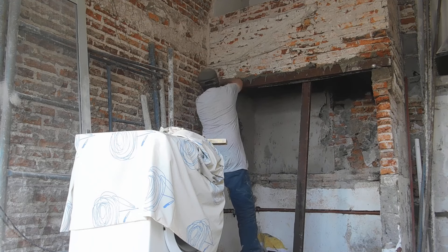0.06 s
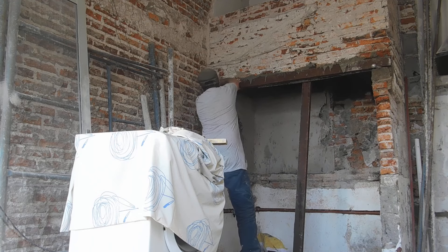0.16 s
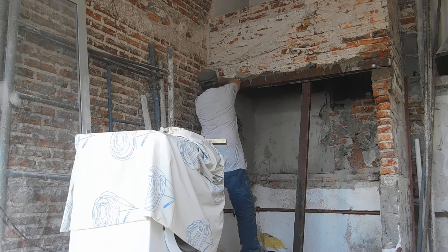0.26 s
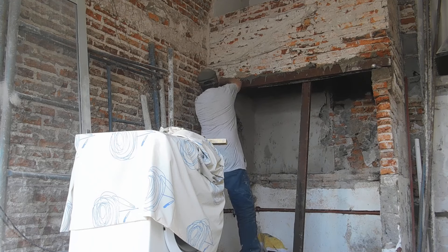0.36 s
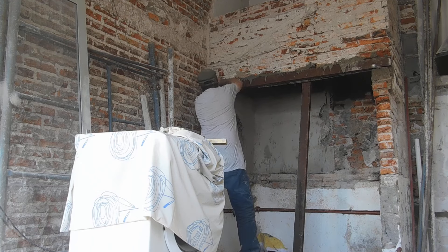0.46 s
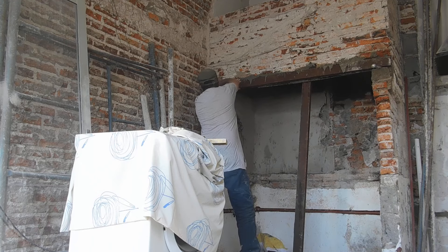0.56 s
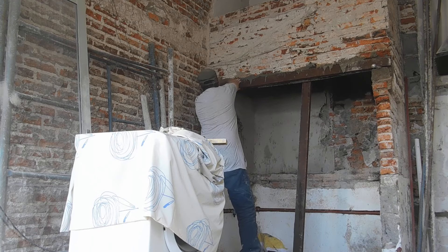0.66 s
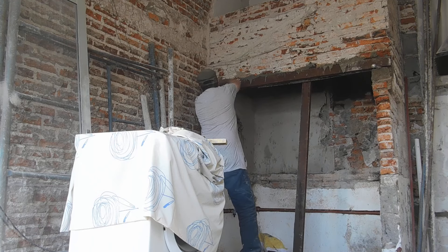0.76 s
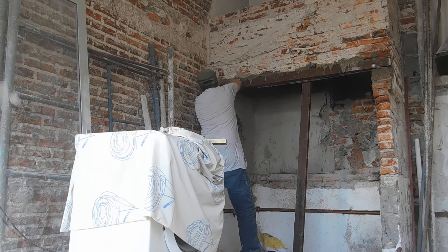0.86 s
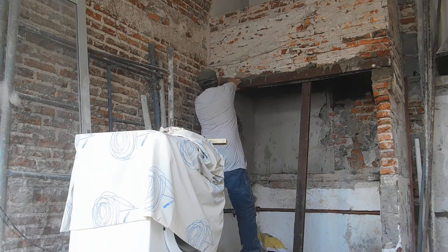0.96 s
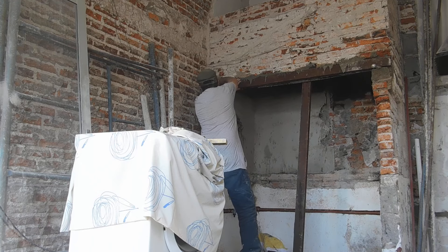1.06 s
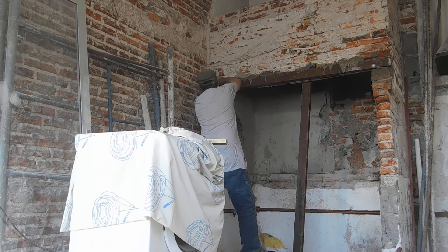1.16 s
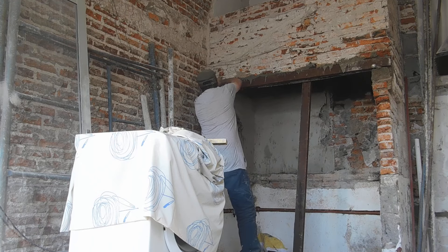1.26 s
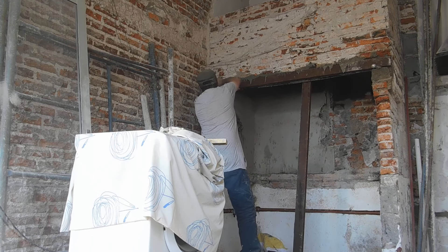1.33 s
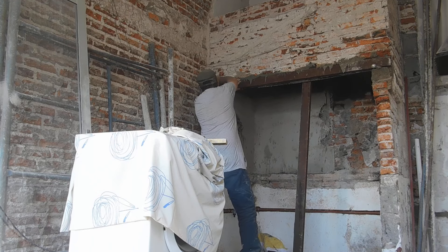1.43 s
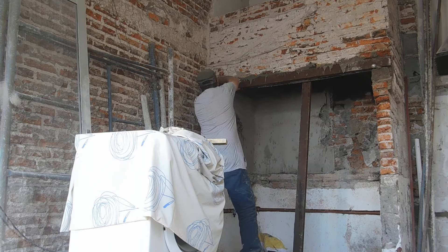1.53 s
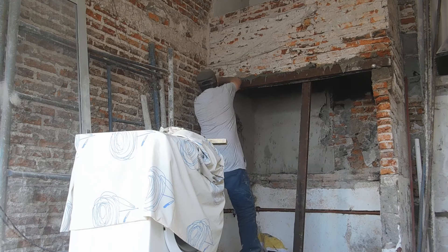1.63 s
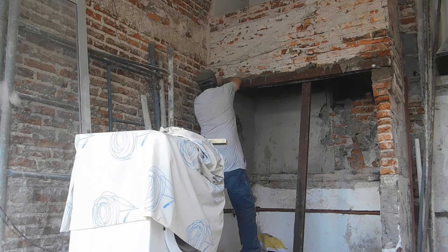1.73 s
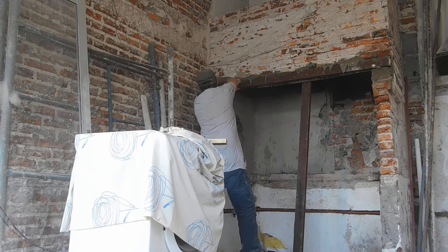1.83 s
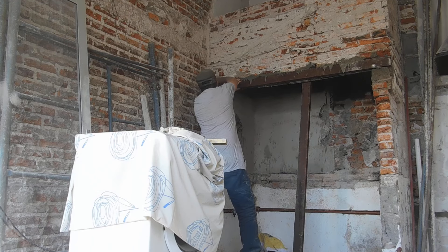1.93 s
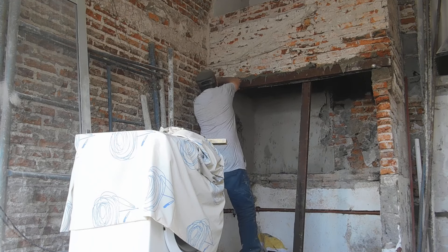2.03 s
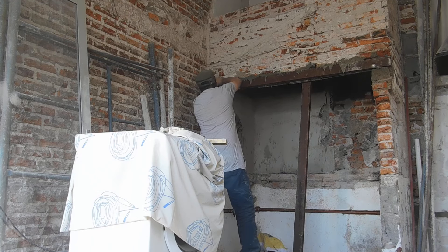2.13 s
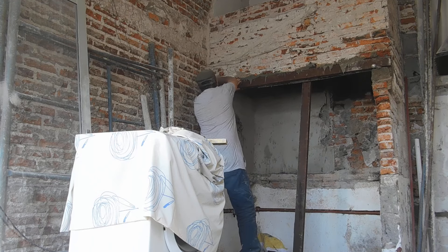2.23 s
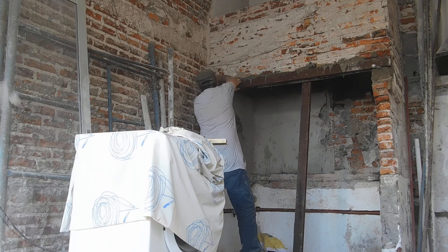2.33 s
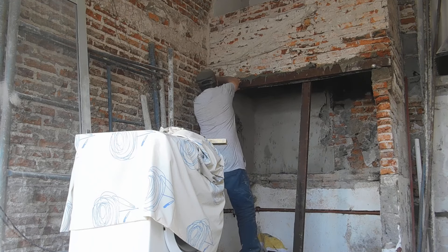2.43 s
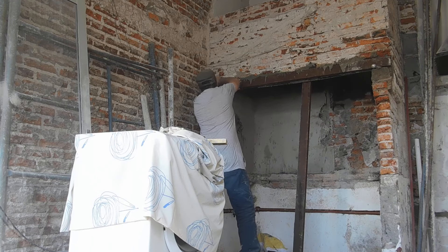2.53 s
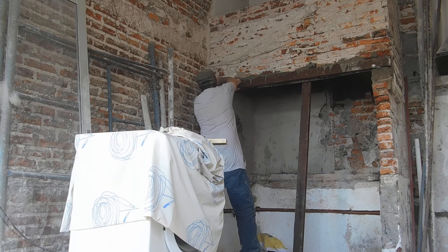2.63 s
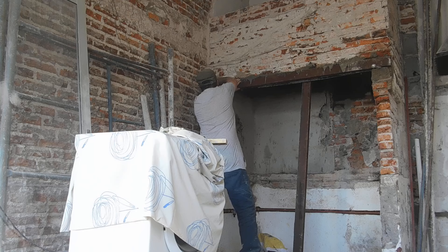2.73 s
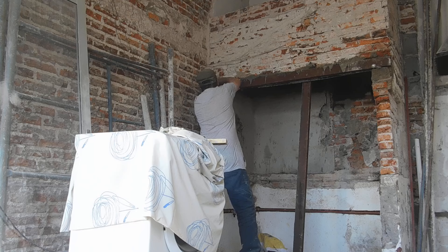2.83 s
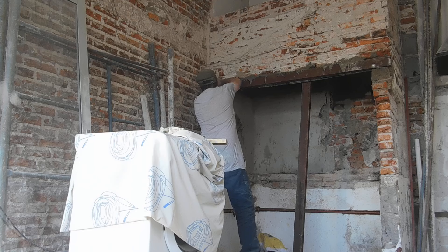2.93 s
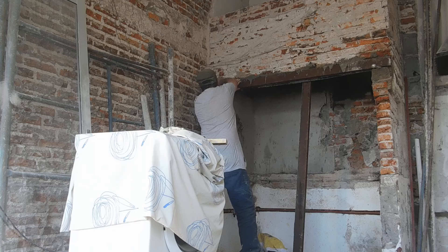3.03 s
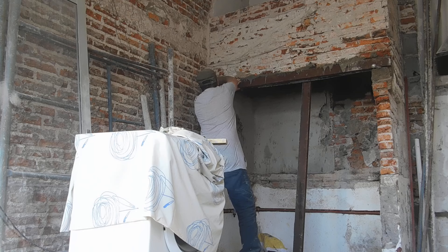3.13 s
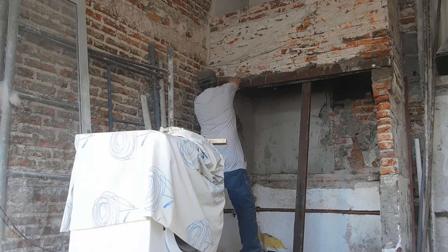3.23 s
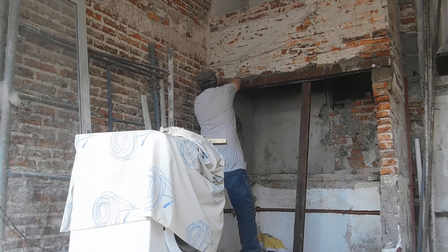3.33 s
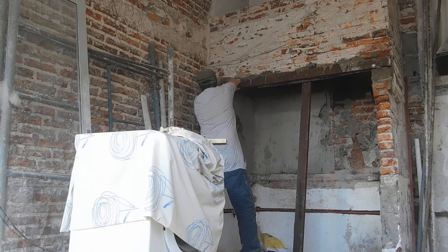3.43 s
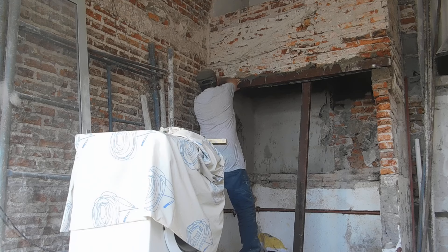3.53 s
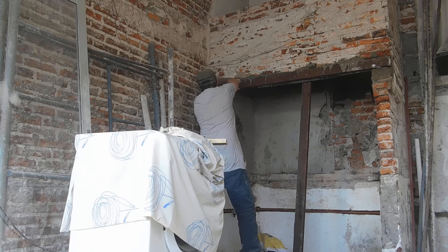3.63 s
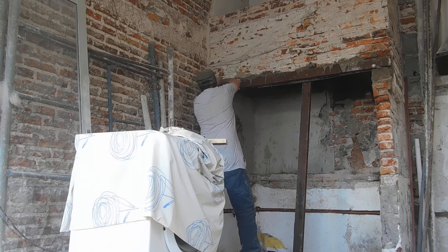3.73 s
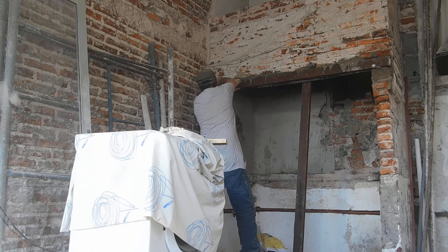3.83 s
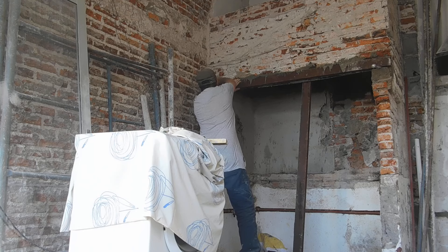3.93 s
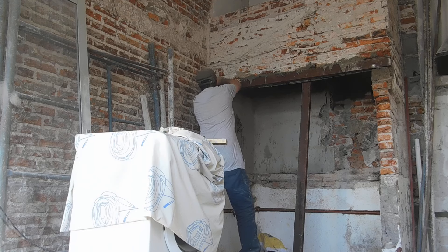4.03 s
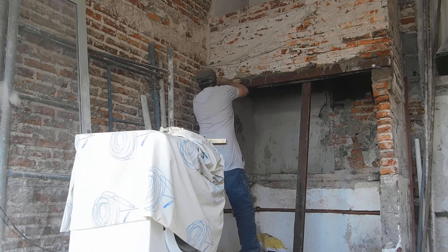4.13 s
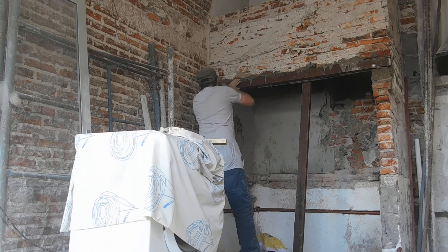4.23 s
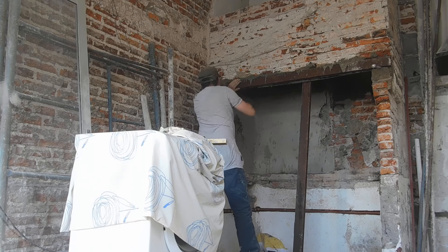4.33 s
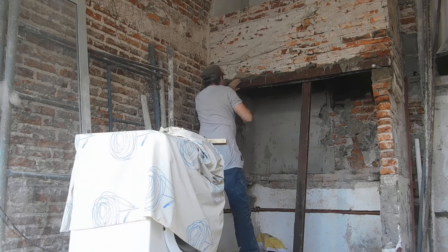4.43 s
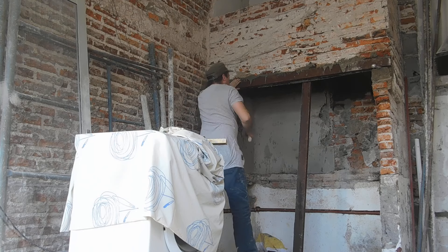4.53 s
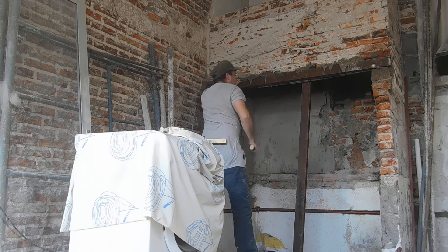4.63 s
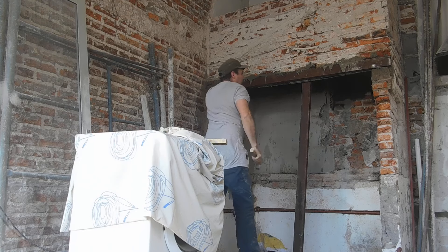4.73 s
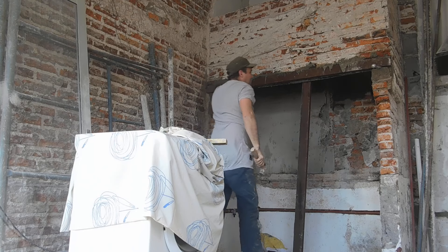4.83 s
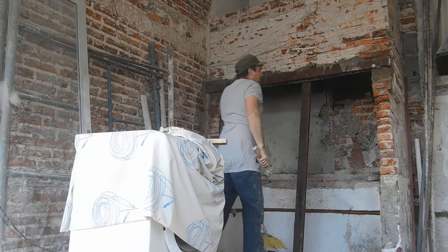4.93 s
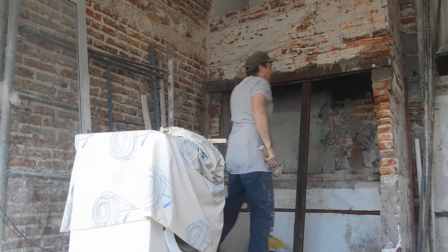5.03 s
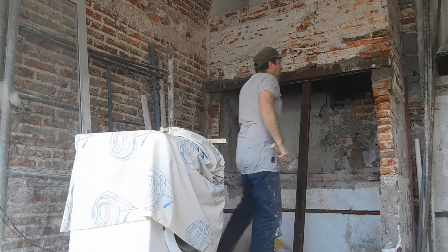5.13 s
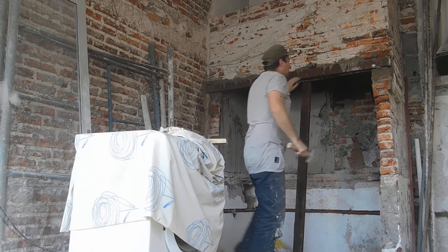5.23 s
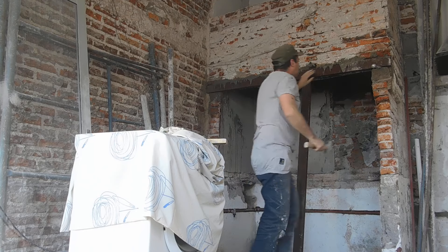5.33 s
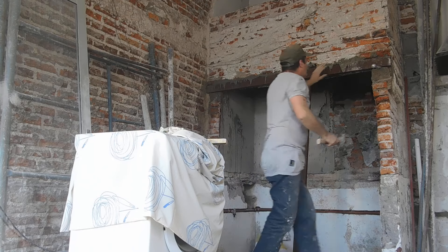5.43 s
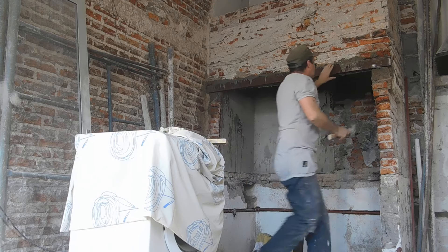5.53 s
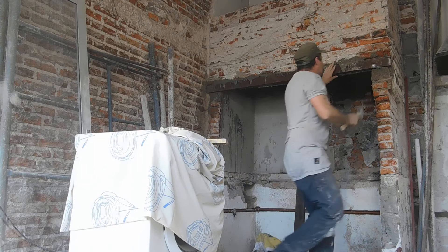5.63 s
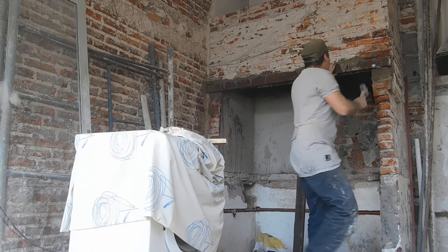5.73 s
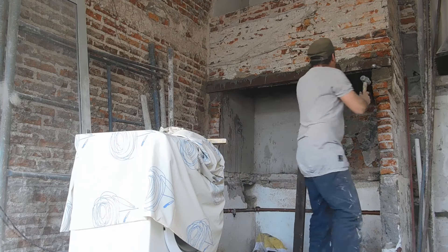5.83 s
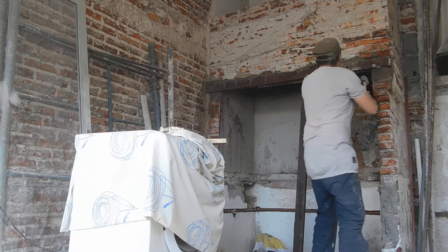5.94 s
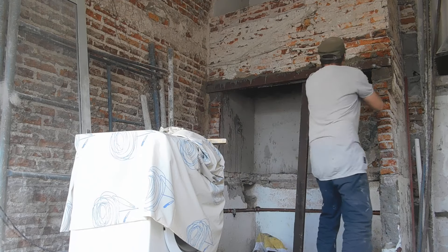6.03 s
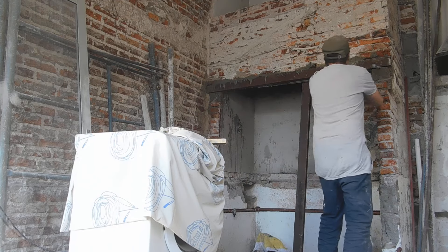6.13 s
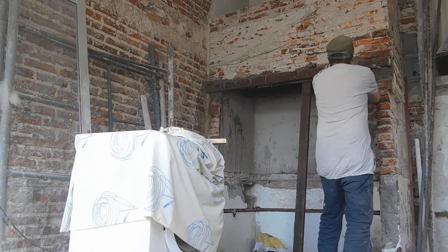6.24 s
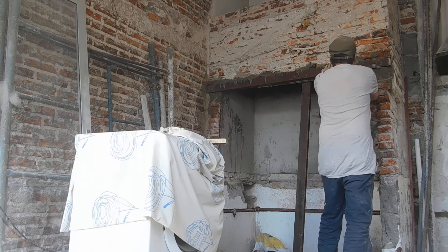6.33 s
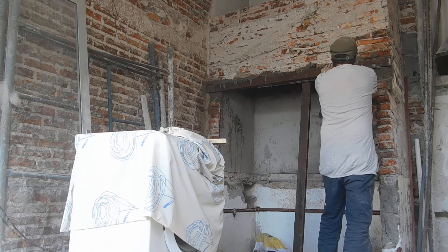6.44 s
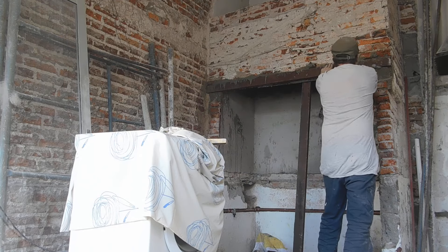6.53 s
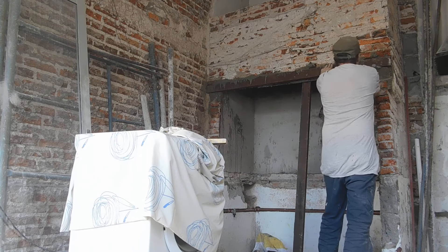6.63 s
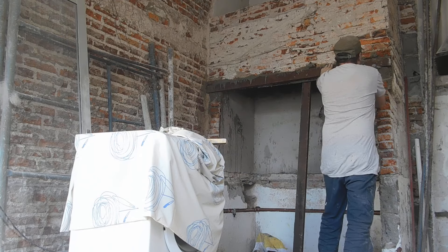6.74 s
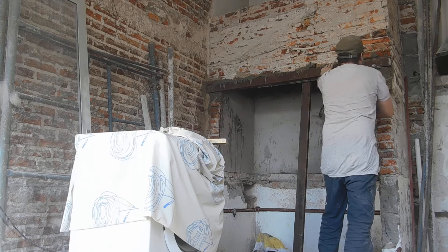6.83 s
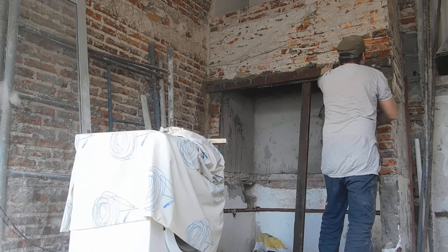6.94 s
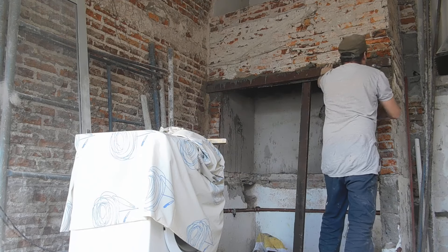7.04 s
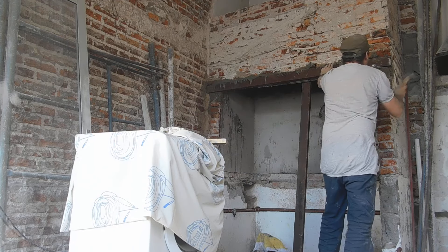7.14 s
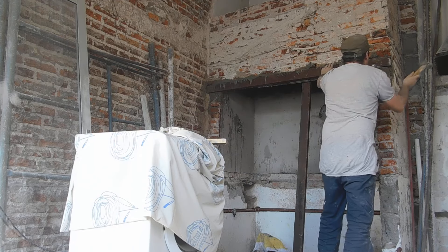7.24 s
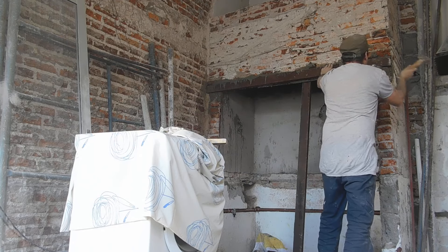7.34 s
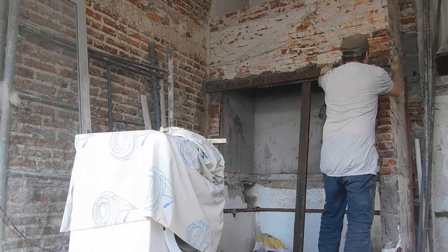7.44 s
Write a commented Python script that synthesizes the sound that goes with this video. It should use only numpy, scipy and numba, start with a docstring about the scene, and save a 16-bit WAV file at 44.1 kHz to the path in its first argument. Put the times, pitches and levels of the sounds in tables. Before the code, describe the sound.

A hammer hits a steel beam bedded in brick, ten loud blows about 0.4 seconds apart, each a cracking thud with a short, damped metallic clang and a patter of mortar crumbs. Then soft knocks and gritty footsteps, and one more blow at another spot. Bare, hard room; distant traffic faintly underneath; stereo microphones at a modest distance overload on the strikes.

```python
"""A hammer strikes a steel lintel bedded in brick: ten even blows at one spot, a few scuffing steps,
then one more blow at the other end. Detuned steel modes ring over decaying noise for cracking masonry;
tiny noise bursts patter as grit. Rubbed grit, soft knocks, thin clinks and a distant town fill the gaps.
A bare brick room rings on, and the two microphones overload and limit on the blows."""
import sys
import numpy as np
from scipy import signal
from scipy.fft import rfft, irfft, next_fast_len
from scipy.io import wavfile
from numba import njit

SR = 44100
rng = np.random.default_rng(int(sys.argv[2]) if len(sys.argv) > 2 else 0)


def dump_mix(stems):
    """Bounce the given channels to the path in sys.argv[1] as a 16-bit WAV at rate SR."""
    frames = np.atleast_2d(stems).T  # one column per channel
    limited = np.clip(frames, -1, 1)  # hard clip at full scale
    pcm = np.round(limited * 32767).astype(np.int16)
    wavfile.write(sys.argv[1], SR, pcm)


N = 329868
TIME = np.arange(N) / SR
RING = TIME[:SR]  # the one second given to every struck sound


def undb(db):
    """Decibels to gain."""
    return 10 ** (np.asarray(db) / 20)


def unit(x):
    """Scale to rms 1."""
    return x / np.sqrt(np.mean(x ** 2))


def at(table, hz):
    """Read (frequency, value) points on a log-frequency axis."""
    f, value = np.transpose(table)
    return np.interp(np.log(np.maximum(hz, 1)), np.log(f), value)


def bins(size):
    """Frequencies in Hz of the spectrum of so many samples."""
    return np.arange(size // 2 + 1) * SR / size


def colour(x, table):
    """Causal minimum-phase filter with the given dB response, built from its cepstrum."""
    size = 4096
    cepstrum = irfft(np.log(undb(at(table, bins(size)))))
    # fold the cepstrum forward in time
    cepstrum[1:size // 2] *= 2
    cepstrum[size // 2 + 1:] = 0
    impulse = irfft(np.exp(rfft(cepstrum)))
    return signal.fftconvolve(x, impulse[None], axes=1)[:, :x.shape[1]]


def fade(t60):
    """Exponential decay over one second, falling 60 dB in t60 seconds."""
    return np.exp(-np.log(1000) * RING / max(t60, 1 / SR))


def wander(hz):
    """Random values drawn hz times a second and joined by straight lines."""
    return np.interp(TIME * hz, np.arange(N), rng.standard_normal(N))


def add(out, s, x):
    """Mix x into out from s seconds."""
    start = max(int(s * SR), 0)
    out[:, start:start + x.shape[1]] += x[:, :N - start]


# likeness of diffuse sound at the two microphones: pitch_hz [Hz], correlation [-1 to 1]
MIC_LIKENESS = [(60, 1), (300, 0.99), (700, 0.92), (1300, 0.6), (2400, 0.68), (4400, 0.12), (9000, 0.1)]


def diffuse(size):
    """White stereo noise at rms 1, alike in the bass and nearly unrelated in the treble."""
    mid, side = rfft(rng.standard_normal((2, size)))
    alike = np.clip(at(MIC_LIKENESS, bins(size)), -1, 1)
    mid = mid * np.sqrt(1 + alike)
    side = side * np.sqrt(1 - alike)
    return unit(irfft([mid + side, mid - side], size))


# decay of the bare brick room: pitch_hz [Hz], t60_s [s]
ROOM_DECAY = [(120, 0.72), (260, 0.58), (700, 0.48), (1800, 0.48), (4500, 0.41), (8000, 0.29),
              (14000, 0.28)]


def room_tail(build_s=0.0047):
    """Reflections thicken quickly, then each octave dies at its own rate; mean channel energy is 1."""
    noise = rfft(diffuse(SR))
    centres = 2. ** np.arange(6, 15)
    tail = 0
    for hz, own in zip(centres, np.eye(len(centres))):
        # a band peaking at its centre and crossfading to its neighbours
        band = irfft(noise * at(np.c_[centres, own], bins(SR)))
        tail = tail + band * fade(at(ROOM_DECAY, hz))
    return unit(tail * (1 - np.exp(-RING / build_s))) / np.sqrt(SR)


def in_room(x, wet_db):
    """A sound together with its reflections."""
    reflections = signal.fftconvolve(x, room_tail(), axes=1)[:, :x.shape[1]]
    return x + undb(wet_db) * reflections


# tone of the distant traffic wash: pitch_hz [Hz], gain_db [dB]
TOWN_TONE = [(20, -10), (50, -5.5), (100, -4.5), (145, -8.5), (320, -8.5), (450, -13), (800, -11),
             (1700, -18.5), (4200, -29.5), (15000, -36)]
# tone of a far engine: pitch_hz [Hz], gain_db [dB]
DRONE_TONE = [(40, -34), (62, -7), (73, -5), (80, -13.5), (95, -29), (200, -52.5)]


def town(wash_db=-52.5, drone_db=-55):
    """A faint, gently swaying wash of traffic noise over a low engine drone."""
    sway_db = .8 * wander(3)
    wash = unit(colour(diffuse(N), TOWN_TONE)) * undb(wash_db + sway_db)
    drone = unit(colour(diffuse(N), DRONE_TONE)) * undb(drone_db)
    return wash + drone


# strokes of a sole or hand over grit, with levels before the lean and trim below:
# start_s [s], length_s [s], rasp_db [dB], hiss_db [dB], rub_db [dB]
STROKES = [(0.01, 0.13, -34.5, -40.5, -49), (4.85, 0.031, -47.5, -49, -53),
           (5.02, 0.067, -36, -44.5, -44.5), (5.188, 0.61, -50.5, -55, -61),
           (5.537, 0.078, -26.5, -40.5, -37), (5.752, 0.066, -32.5, -48, -45),
           (5.935, 0.22, -27, -39.5, -42)]
# tones of the rough rasp, the fine hiss and the dull rub: pitch_hz [Hz], gain_db [dB]
RASP_TONE = [(300, -42), (900, -13), (1400, -2), (1800, 1.5), (2200, -2.5), (2700, -5), (3500, -9),
             (5000, -13), (8000, -35)]
HISS_TONE = [(3000, -14), (6000, -5), (10000, -9), (16000, -13.5)]
RUB_TONE = [(60, -21.5), (200, -12), (500, -0.5), (1100, -1.5), (2000, -24.5), (6000, -51)]


def scraping(rub_trim_db=-1, grain_db=1.5, grain_hz=900, slip_db=2.0, slip_hz=70, wet_db=-7):
    """Grit catches and slips under soles and hands: a rasp that grows with weight, a hiss, a dull rub."""
    attack_s, release_t60 = 0.12, 0.23  # touching down before a stroke, lifting off after it
    lean_db, lean_share = 4, 0.69  # rise of the rasp, share of the stroke it takes
    grains = unit(undb(grain_db * wander(grain_hz) + slip_db * wander(slip_hz)))
    rasp, hiss, rub = (unit(colour(diffuse(N) * grains, tone))
                       for tone in (RASP_TONE, HISS_TONE, RUB_TONE))
    out = np.zeros((2, N))
    for start_s, length_s, rasp_db, hiss_db, rub_db in STROKES:
        age = TIME - start_s
        attack = np.clip(1 + age / attack_s, 0, 1) ** 2
        release = np.exp(-np.log(1000) * np.maximum(age - length_s, 0) / release_t60)
        weight = np.clip(age / (length_s * lean_share), 0, 1)
        stroke = undb(rasp_db - lean_db * (1.5 - weight)) * rasp
        stroke = stroke + undb(hiss_db) * hiss
        stroke = stroke + undb(rub_trim_db + rub_db) * rub
        out += attack * release * stroke
    return in_room(out, wet_db)


# a tool clinks on the steel: start_s [s], pitch_hz [Hz], level_db [dB], t60_s [s]
TOOL_CLINKS = [(.106, 5530, -43, .35), (7.431, 5100, -59, .2)]


def clinks():
    """A tool sets off one thin steel partial, a decaying sine with a random phase on each side."""
    out = np.zeros((2, N))
    for start_s, pitch_hz, level_db, t60_s in TOOL_CLINKS:
        partial = np.sin(2 * np.pi * (pitch_hz * RING + rng.random((2, 1))))
        add(out, start_s, undb(level_db) * partial * fade(t60_s))
    return out


# the lintel's bending modes, in close groups, before random scatter: pitch_hz [Hz], level_db [dB]
STEEL_MODES = [(425, -34.5), (547, -11), (576, -8), (720, -14), (769, -1.5), (797, -4), (809, -2),
               (829, 2.5), (1034, -3), (1060, 5.5), (1087, 3.5), (1302, 1), (1324, 0.5), (1355, -6.5),
               (1500, -5.5), (1535, 1.5), (1568, -4), (1638, -8.5), (1698, 1), (1719, -5), (2005, -7),
               (2375, -9.5), (2632, -21.5), (2820, -13), (3085, -13.5), (3255, -15.5), (3545, -14),
               (4040, -34), (4900, -28.5)]
# one mode that hangs on, before random scatter: pitch_hz [Hz], level_db [dB], t60_s [s]
LINGERING_MODE = (778, -33, 1.5)


def steel(scatter_db=1, spread=0.44, ear_db=2, damping_slope=0.044, bloom_s=0.0025):
    """The lintel's modes as one spot excites them; the ring takes a moment to spread along the beam."""
    t60_1k = 0.18  # seconds at 1 kHz: the mortar damps the steel quickly
    side = np.array([[1], [-1]]) / 2
    modes = [(hz, db, t60_1k * (1000 / hz) ** damping_slope) for hz, db in STEEL_MODES]
    modes.append(LINGERING_MODE)
    chances = rng.standard_normal((len(modes), 4))
    out = 0
    for (hz, db, t60), (weight, start, skew, pan) in zip(modes, chances):
        # higher modes reach the two microphones further out of step
        phase = 2 * np.pi * (hz * RING + start) + side * spread * skew * hz / 1000
        level_db = db + scatter_db * weight + side * ear_db * pan
        out = out + undb(level_db) * np.sin(phase) * fade(t60)
    return out * (1 - np.exp(-RING / bloom_s) / 2)


# dense, short ring of brick, mortar and hammer head: pitch_hz [Hz], gain_db [dB]
CRACK_TONE = [(30, -29), (70, -21.5), (150, -19), (380, -11), (550, -2.5), (1000, -1.5), (1650, 0),
              (2300, -5.5), (3300, -8.5), (4500, -16), (7000, -17.5), (10000, -26), (16000, -33.5)]
# the wall's dull answer: pitch_hz [Hz], gain_db [dB]
THUD_TONE = [(25, 2.5), (60, 3), (160, 8), (300, -6.5), (600, -13.5), (2000, -55.5)]


def masonry(t60=0.055, wet_db=3, shudder_db=-24, shudder_t60=0.097, thud_db=-22, thud_t60=.22):
    """Brick and mortar crack as a burst of dense noise, with a brief shudder and a low thud."""
    crack = diffuse(SR) * (fade(t60) + undb(shudder_db) * fade(shudder_t60))
    thud = colour(rng.standard_normal((2, SR)), THUD_TONE) * fade(thud_t60)
    return in_room(colour(crack, CRACK_TONE), wet_db) + undb(thud_db) * thud


# hammer blows, relative levels: start_s [s], force_db [dB], steel ring_db [dB],
# masonry thud_db [dB], bite_db near 3 kHz [dB], treble crack_db [dB]
HAMMER_BLOWS = [(0.239, 2.6, -12, 0.5, -0.5, 3.5), (0.6567, 4, -6, 3.5, -0.5, -4),
                (1.0268, 1.4, -5, 4, 6.5, -3.5), (1.4405, 5.5, -6, 2, 0.5, 1.5),
                (1.8579, 1.6, -2, 2, 5.5, -2), (2.2695, 4, -3, 2.5, -3.5, -9.5),
                (2.685, 2.5, -4, 2, 5, -0.3), (3.0988, 5.5, -7, -3.6, 2.5, 2.5),
                (3.5014, 3, -3.5, -0.8, 7, 2), (3.9052, 2.5, -4.5, 1, 5, 2),
                (6.5535, 3.5, -5, 2.5, 0, -6.5)]
# the parts of the masonry sound that repeat and that are new each blow: pitch_hz [Hz], gain_db [dB]
REPEATED_PART = [(300, -5), (900, -2.5), (2000, -3), (6000, -8)]
RENEWED_PART = [(300, -1.5), (900, -3.5), (2000, -3), (6000, -1)]


def hammering(steel_db=-3, steel_wet_db=-3, masonry_db=11.5):
    """Blows on one spot repeat nearly the same clang; the crumbling contact is new, mostly in the treble."""
    crossing_s = 5  # blows after this land on the second spot
    spots = [(in_room(steel(), steel_wet_db), colour(masonry(), REPEATED_PART)) for _ in range(2)]
    out = np.zeros((2, N))
    for start_s, force_db, ring_db, thud_db, bite_db, crack_db in HAMMER_BLOWS:
        clang, brick = spots[int(start_s > crossing_s)]
        # the hammer never lands on quite the same point
        clang = clang + steel() / 3
        brick = brick + colour(masonry(), RENEWED_PART)
        blow = undb(steel_db + ring_db) * clang + undb(masonry_db) * brick
        # a harder contact is brighter
        contact = [(450, thud_db), (800, 0.0079), (1900, 0), (3100, bite_db), (6500, crack_db)]
        add(out, start_s, undb(force_db) * colour(blow, contact))
    return out


def grit(count=50, size_db=-56, scatter_db=3, chip_t60=0.011, wet_db=0):
    """After each blow crumbs of mortar patter down, each a tiny decaying noise burst."""
    out = np.zeros((2, N))
    for start_s, *_ in HAMMER_BLOWS:
        crumbs = np.zeros((2, SR))
        when = (rng.uniform(.08, .42, count) * SR).astype(int)  # seconds after the blow, to samples
        crumbs[:, when] = undb(size_db + scatter_db * rng.standard_normal(count))
        chip = diffuse(SR) * fade(chip_t60)
        add(out, start_s, signal.fftconvolve(crumbs, chip, axes=1)[:, :SR])
    return colour(in_room(out, wet_db), [(500, -33.5), (2000, -15), (6000, 9.5), (15000, -2.5)])


# light knocks of tools, boots and falling chips:
# start_s [s], level_db before colouring [dB], relative treble_db [dB]
LIGHT_KNOCKS = [(4.3393, -33, 10), (4.4058, -25, 6), (4.551, -37.5, 1), (4.6408, -31, 12), (4.8234, -27, 3),
                (4.986, -31, 8), (5.2695, -31.5, -3), (5.5616, -18, -10), (6.4892, -24, 4),
                (6.5105, -31.5, 11.5), (7.223, -43.5, 19.5), (7.3123, -38, -12.5), (7.4302, -43, -12)]


def knocks(t60=0.035, touch_s=.003, wet_db=1):
    """Small soft contacts on brick: coloured noise that swells in briefly and dies fast."""
    out = np.zeros((2, N))
    touch = 1 - np.exp(-RING / touch_s)
    for start_s, level_db, treble_db in LIGHT_KNOCKS:
        tone = [(150, -18.5), (800, -1.5), (1800, 11.0), (3500, 3.0),
                (7000, treble_db - 15.0), (15000, treble_db - 25.5)]
        knock = colour(diffuse(SR) * touch * fade(t60), tone)
        add(out, start_s, undb(level_db) * in_room(knock, wet_db))
    return out


def lag_left(x, lag_s=0.00004):
    """The blows reach the left microphone a fraction of a millisecond later, as a phase slope."""
    size = next_fast_len(N + 64)
    delay_s = np.array([[lag_s], [0]])
    return irfft(rfft(x, size) * np.exp(-2j * np.pi * bins(size) * delay_s), size)[:, :N]


def scene():
    """All sources at the two microphones."""
    return lag_left(hammering()) + grit() + knocks() + clinks() + scraping() + town()


@njit
def follow(x, attack, release):
    """Peak follower: each sample closes a share of the gap, a larger one rising than sinking."""
    out, e = np.empty(len(x)), 0.
    for i in range(len(x)):
        e += (x[i] - e) * (attack if x[i] > e else release)
        out[i] = e
    return out


def turn_down(x, ceiling, slope, attack_s, release_s):
    """Gain control: takes away a share (slope) of the dB by which the peaks pass the ceiling."""
    peak = follow(np.abs(x).max(axis=0), 1 / (attack_s * SR), 1 / (release_s * SR))
    return x * (ceiling / np.maximum(peak, ceiling)) ** slope


def record(dry, headroom=1.59, top_hz=15800):
    """Microphones round the peaks; compressor and limiter act late, so the onsets of blows flatten."""
    x = headroom * np.tanh(dry / headroom)
    x = turn_down(x, ceiling=0.4, slope=0.46, attack_s=0.0027, release_s=0.045)
    x = turn_down(x, ceiling=0.95, slope=0.57, attack_s=0.0063, release_s=0.016)
    x = x / (1 + x ** 8) ** (1 / 8)  # sharp-kneed clipping towards full scale
    low_pass = signal.ellip(8, .2, 70, top_hz, fs=SR, output="sos")
    return signal.sosfilt(low_pass, x)


dry = scene()
out = record(dry)
dump_mix(out)
```